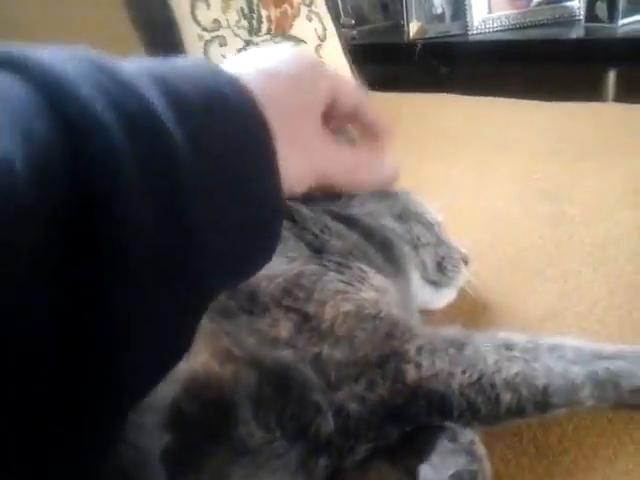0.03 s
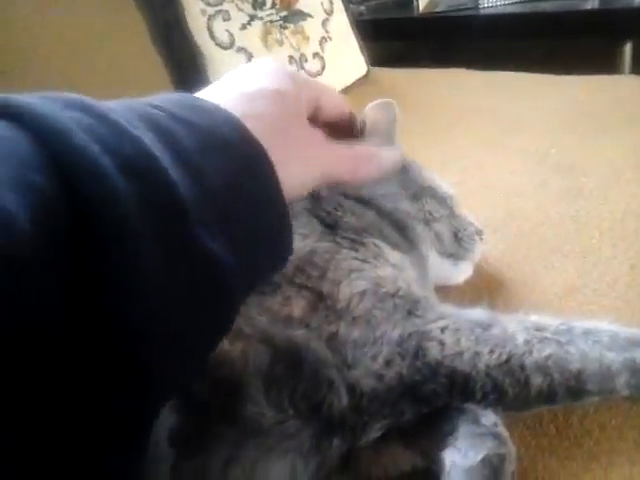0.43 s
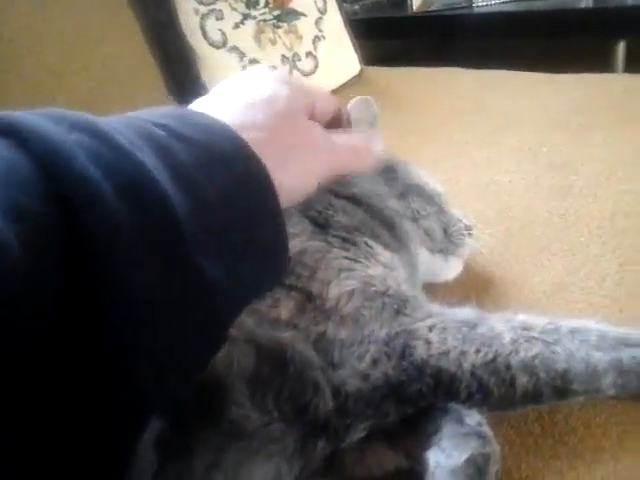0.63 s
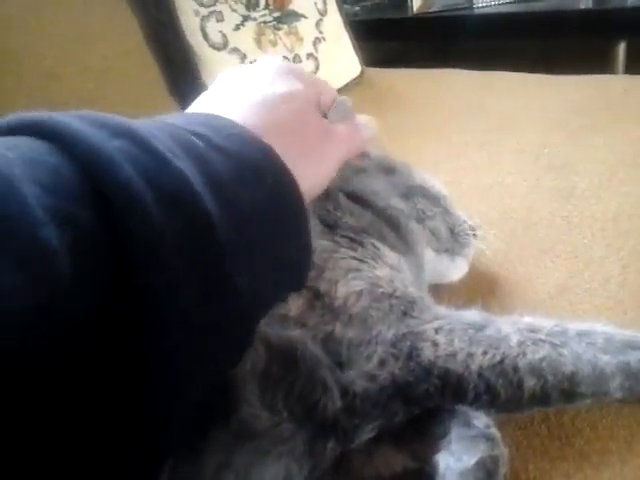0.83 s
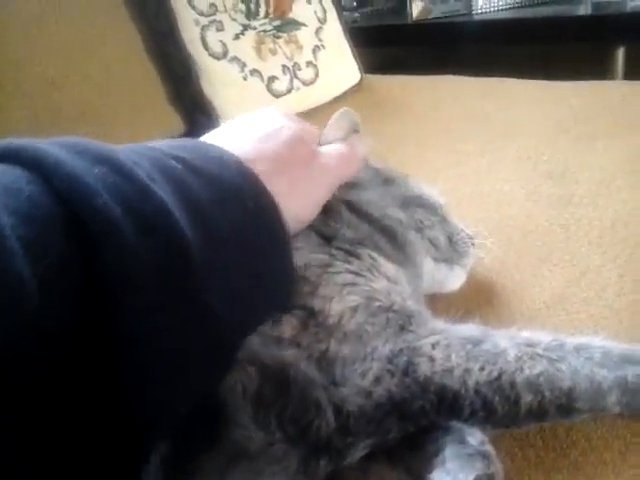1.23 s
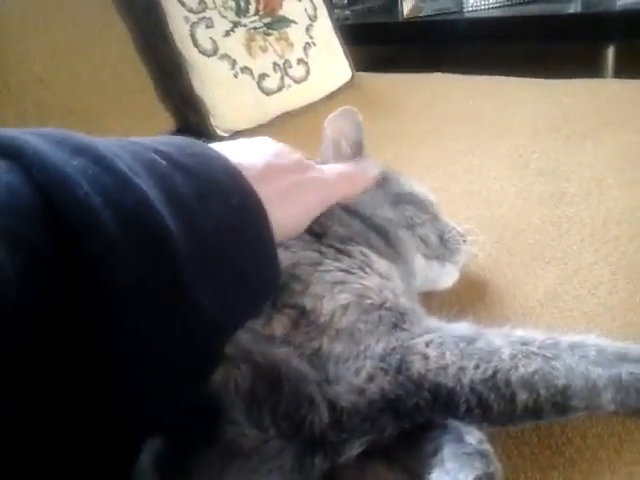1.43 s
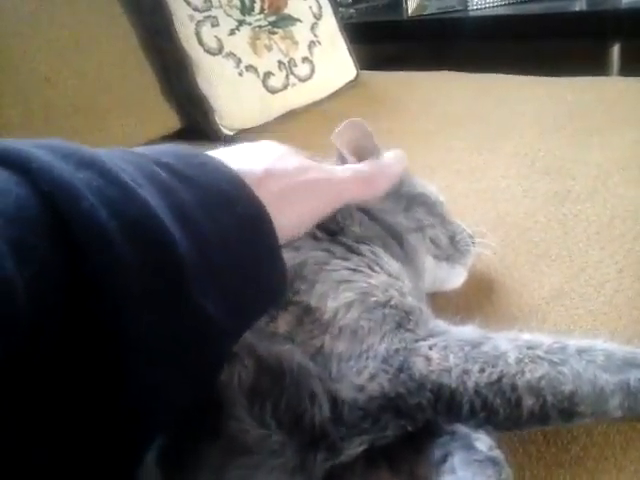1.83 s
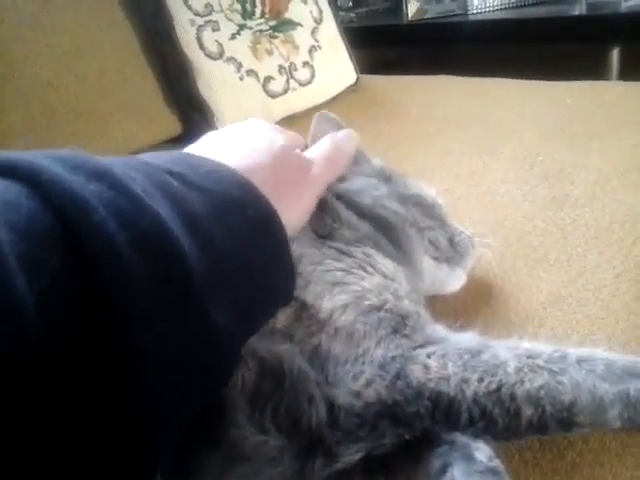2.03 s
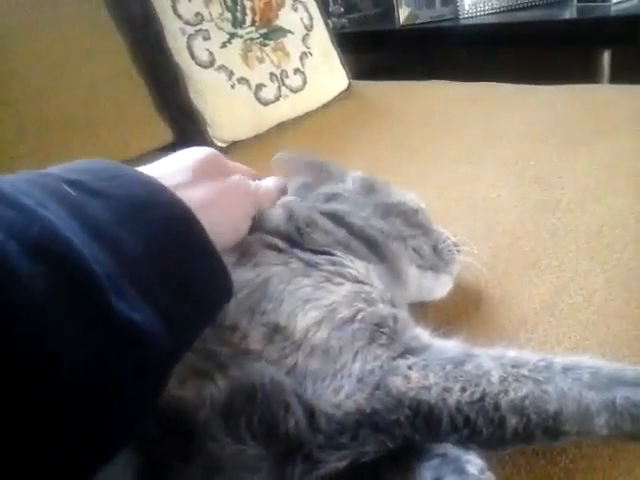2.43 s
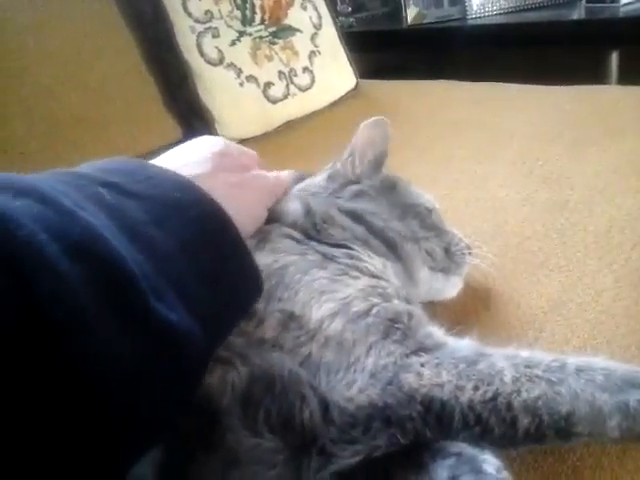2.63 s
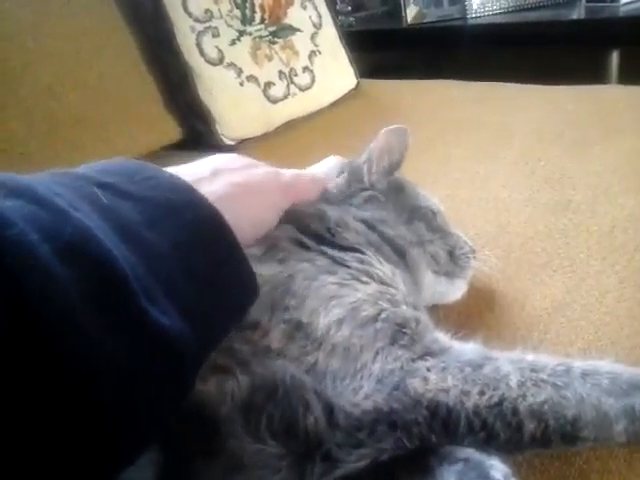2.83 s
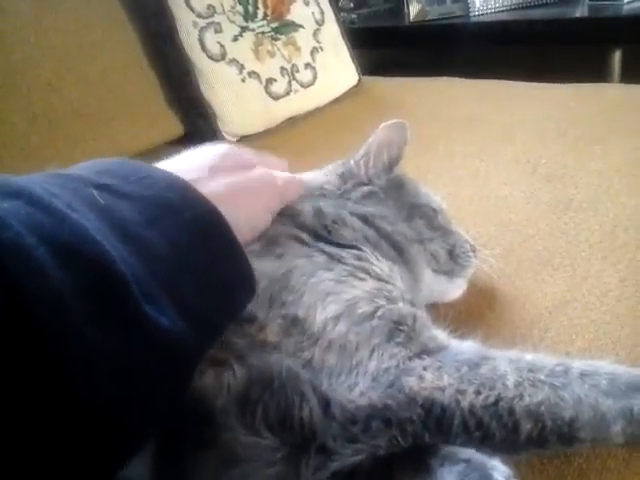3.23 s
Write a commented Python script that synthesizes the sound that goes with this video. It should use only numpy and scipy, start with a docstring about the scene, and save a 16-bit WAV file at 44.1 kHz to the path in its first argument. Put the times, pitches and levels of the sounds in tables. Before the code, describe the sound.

A faint low hum rises and falls over room rumble and hiss. A nearby hand strokes a cat with a barely audible rustle and a few tiny ticks, followed by soft handling bumps and one light plastic clack.

```python
"""In a quiet room, a cat is stroked: its fur crackles faintly as hairs slip under the fingers.
Something plastic is knocked and clacks once; there are also soft handling bumps and faint high pips.
A low hum, probably a far engine heard through the walls, swells and fades as it slowly sinks in pitch.
Mains hum, rumble and hiss lie underneath. The recorder's expander (an automatic volume control)
turns quiet moments down, so the hiss rises and falls with the far hum."""
import sys
import numpy as np
from scipy import signal
from scipy.fft import rfft, irfft
from scipy.io import wavfile
from scipy.ndimage import uniform_filter1d

SR = 44100
rng = np.random.default_rng(int(sys.argv[2]) if len(sys.argv) > 2 else 0)


def wav_out(sig):
    """Save sig, one row per channel (or a flat mono array), as 16-bit PCM at SR to the path in sys.argv[1]."""
    wavfile.write(sys.argv[1], SR, np.round(np.clip(np.atleast_2d(sig).T, -1, 1) * 32767).astype(np.int16))


N = 145530

# All levels apply before the expander turns them down.
# Bands where the fur crackles. Each row: centre in Hz, width in Hz, relative level in dB.
FUR_BANDS = [(4960, 450, -0.5), (5690, 690, -3), (6530, 360, -13.5)]
# Brushes of the fingers. Each row: time in seconds, boost to the crackle in dB.
BRUSHES = [(.54, 6.5), (.73, 1), (1.21, 2.5)]
# Single hairs snapping. Each row: start in seconds, level in dB.
SNAPS = [(0.2702, -49.5), (.406, -61), (0.4195, -47), (1.558, -57), (2.050, -59)]
# Knocks within the clack. Each row: time in seconds, strength in dB, length in seconds.
KNOCKS = [(2.6863, -1, 0.0001), (2.69, -14.5, 0.000088), (2.6943, 2.5, .0001), (2.69629, 2, 0.00028),
          (2.6978, 1, 0.000068)]
# Tones the plastic rings with. Each row: pitch in Hz, relative level in dB, seconds to fade by 60 dB.
PLASTIC_TONES = [(231.4, -35.5, 0.053), (344, -41.5, 0.052), (510, -47, 0.013), (860, -39.5, 0.0061),
                 (1247, -39.5, 0.0064), (1700, -42.5, 0.0046), (2233, -42, 0.024), (2314, -43, 0.031),
                 (3300, -46, 0.071), (3950, -43.5, 0.043), (4114, -35, 0.0089), (4436, -41, 0.043),
                 (4940, -44.5, 0.019), (5500, -49, 0.012)]
# Soft handling bumps. Each row: time in seconds, pitch in Hz, level in dB.
BUMPS = [(1.45, 225, -61), (1.975, 290.6, -63), (2.105, 254, -60), (2.535, 299, -56.5), (2.91, 48, -52)]
# Faint high pips. Each row: time in seconds, pitch in Hz, level in dB.
PIPS = [(1.425, 5100, -69), (1.675, 4800, -66), (2.63, 4980, -71), (2.795, 4950, -69.5),
        (2.838, 6280, -64.5), (2.93, 5000, -71), (3.285, 4980, -63)]
# The far hum's swells. Each row: time in seconds, level in dB.
HUM_LEVEL = [(0.0, -59), (0.08, -57), (0.27, -47), (0.44, -44), (0.58, -46.5), (0.68, -44), (0.87, -49),
             (1.0, -43), (1.11, -39), (1.24, -43), (1.41, -51), (1.52, -45.5), (1.65, -56.5), (1.76, -67),
             (1.9, -65.7), (1.97, -50.5), (2.02, -55), (2.12, -47.0), (2.25, -48), (2.42, -54.0),
             (2.56, -45.5), (2.74, -44), (2.92, -42.5), (3.04, -55.5), (3.14, -60), (3.3, -58)]
# The hum's faint octave, at twice its pitch. Each row: time in seconds, level in dB.
OCTAVE_LEVEL = [(.45, -87), (.6, -60.5), (.95, -69.5), (1.2, -60.5), (1.45, -69.5), (1.75, -63.5),
                (2.05, -65), (2.25, -77), (2.85, -62), (3.1, -76)]
# Room rumble and microphone hiss. Each row: frequency in Hz, level in dB per Hz.
NOISE_SPECTRUM = [(15, -85), (45, -77), (72, -84), (130, -79.5), (200, -86), (280, -88.5), (400, -94),
                  (680, -97), (950, -95.5), (2000, -101), (3400, -102.5), (8000, -104), (14500, -103.7)]


def fur(slips_per_s=900, spread_db=0.5, flicker_db=3, brush_s=0.033):
    """Hairs slip under the fingers: tiny clicks ring in flickering bands and swell at each brush."""
    slips = (rng.random(N) < slips_per_s / SR) * rng.choice([-1, 1], N)
    slips = slips * undb(spread_db * np.minimum(rng.exponential(size=N), 4))
    crackle = 0
    for hz, width, db in FUR_BANDS:
        band = signal.lfilter(*signal.iirpeak(hz, hz / width, fs=SR), slips)
        crackle += undb(db + flicker_db * wander(50)) * band
    brush_db = sum(db * swell(at, brush_s) for at, db in BRUSHES)
    return undb(-68.5 + brush_db) * crackle / crackle.std()


def hair_snaps(decay_s=0.0013):
    """Single hairs snap against the fingers, each a tiny burst of bright noise."""
    out = 0
    for start, db in SNAPS:
        snap = cut(burst(start, decay_s), [4340, 5900], "band", order=3)
        out += undb(db) * snap / np.linalg.norm(snap) * np.sqrt(decay_s * SR)
    return out


def plastic_clack(scrape_db=-47):
    """A few quick knocks make a plastic object ring, and each one scrapes briefly."""
    t = clock()
    ring = sum(undb(db - 60 * t / fade_s) * np.sin(2 * np.pi * hz * t)
               for hz, db, fade_s in PLASTIC_TONES)
    force, scrape = 0, 0
    for at, db, length in KNOCKS:
        push = np.exp(-np.pi * ((t - at) / length) ** 2)
        force += undb(db) * push / push.sum()
        scrape += undb(db + scrape_db) * burst(at, decay_s=0.002)
    clack = convolve(force, ring) + cut(scrape, 5300, "low", order=6)
    return cut(clack, [174, 6000], "band", order=3)


def room_echo(sound, delay_s=0.022, fade_s=0.25, echo_db=-9):
    """The room answers with a short, bright echo that falls 60 dB in fade_s."""
    tail = cut(burst(delay_s, fade_s / np.log(1000)), 3000, "high")
    return undb(echo_db) * convolve(sound, tail / np.linalg.norm(tail))


def far_hum(start_hz=97.8, sink_hz_per_s=2.05):
    """A low tone and its octave, probably a far engine, swell and fade as they sink in pitch."""
    phase = 2 * np.pi * np.cumsum(start_hz - sink_hz_per_s * clock()) / SR
    low = undb(curve(HUM_LEVEL)) * np.sin(phase)
    octave = undb(curve(OCTAVE_LEVEL)) * np.sin(2 * phase)
    return np.sqrt(2) * (low + octave)


def soft_tones(rows, width_s, waver_hz=0):
    """Short tones swell and fade, their pitch unsteady by about waver_hz."""
    drift = np.cumsum(waver_hz * wander(800)) / SR
    return np.sqrt(2) * sum(undb(db) * swell(at, width_s) * np.sin(2 * np.pi * (hz * clock() + drift))
                            for at, hz, db in rows)


def mains_hum(hz=118.8, db=-63.5, waver_db=3):
    """Mains electricity hums at one pitch while its level wavers a little."""
    return np.sqrt(2) * undb(db + waver_db * wander(8.65)) * np.sin(2 * np.pi * hz * clock())


def rumble_and_hiss():
    """The room rumbles and the microphone hisses: steady noise, strongest in the bass."""
    hz, db = np.array(NOISE_SPECTRUM).T
    freqs = np.maximum(np.fft.rfftfreq(N, 1 / SR), 1)
    gain = undb(np.interp(np.log(freqs), np.log(hz), db))
    return irfft(rfft(rng.standard_normal(N)) * gain, N) * np.sqrt(SR / 2)


def undb(db):
    """Turn decibels into a number to multiply by."""
    return 10 ** (np.asarray(db) / 20)


def clock():
    """The time of every sample, in seconds."""
    return np.arange(N) / SR


def curve(rows):
    """Join rows of time and value with straight lines."""
    return np.interp(clock(), *np.array(rows).T)


def swell(at, width_s):
    """A bell-shaped rise and fall around one moment."""
    return np.exp(-((clock() - at) / width_s) ** 2)


def wander(turns_per_s):
    """A smooth random wobble with a typical size of 1."""
    span = int(SR / turns_per_s)
    steps = np.repeat(rng.standard_normal(N // span + 1), span)
    smooth = uniform_filter1d(uniform_filter1d(steps, span), span)[:N]
    return smooth / smooth.std()


def cut(sound, hz, keep, order=2):
    """Keep the lows, the highs or a band; a higher order cuts more sharply."""
    return signal.sosfilt(signal.butter(order, hz, keep, fs=SR, output="sos"), sound)


def convolve(sound, response):
    """Let every sample of a sound set off a ring or an echo."""
    return signal.fftconvolve(sound, response)[:N]


def burst(start, decay_s):
    """Noise that starts at once and dies away."""
    age = clock() - start
    return (age >= 0) * np.exp(-np.abs(age) / decay_s) * rng.standard_normal(N)


def scene():
    """Add up everything that reaches the one microphone."""
    faint_low_tone = soft_tones([(0.48, 156, -62)], width_s=0.2)  # seconds, Hz, dB
    pips = soft_tones(PIPS, width_s=0.015, waver_hz=140)
    bumps = soft_tones(BUMPS, width_s=0.019)
    background = far_hum() + faint_low_tone + mains_hum() + rumble_and_hiss()
    stroking = fur() + hair_snaps()
    clack = plastic_clack()
    return (stroking + clack + room_echo(clack) + bumps + pips + background)[None]


def record(dry):
    """The expander follows the level and turns quiet moments down; the highest treble is cut."""
    threshold_db, react_s, top_hz = -41.5, 0.054, 14560
    expansion = 0.88  # dB turned down for each dB below the threshold
    step = 1 / (react_s * SR)
    start_power = np.mean(dry[:, :SR // 20] ** 2, axis=1, keepdims=True)
    power = signal.lfilter([step], [1, step - 1], dry ** 2, zi=start_power)[0]  # running average
    gain = np.minimum(np.sqrt(power) / undb(threshold_db), 1) ** expansion
    treble_cut = signal.ellip(12, .1, 70, top_hz, fs=SR, output="sos")
    return signal.sosfilt(treble_cut, dry * gain)


dry = scene()
out = record(dry)
wav_out(out)
```